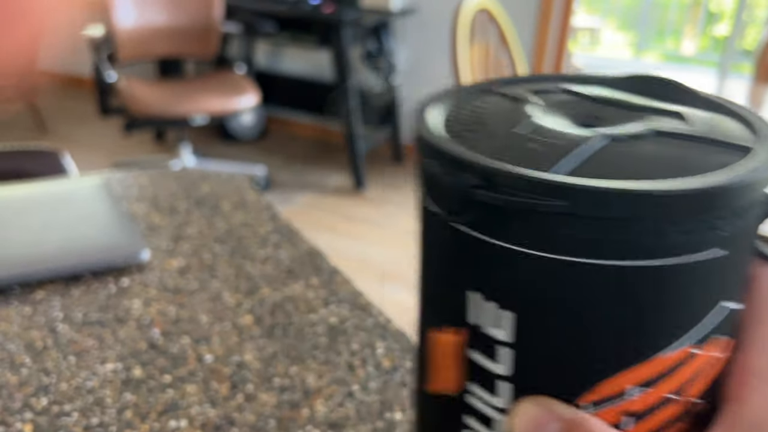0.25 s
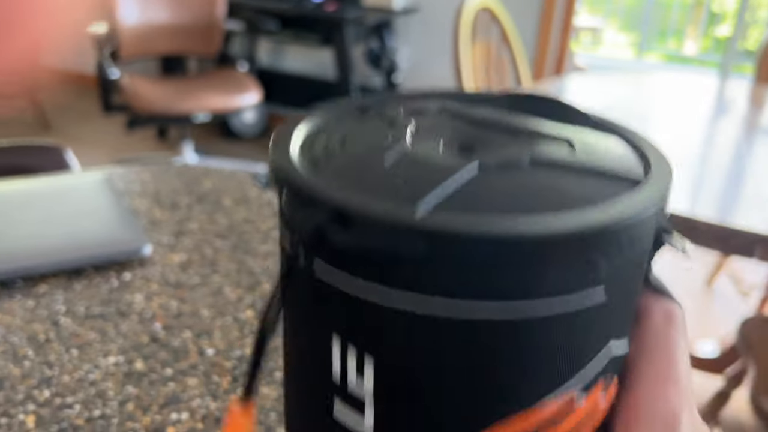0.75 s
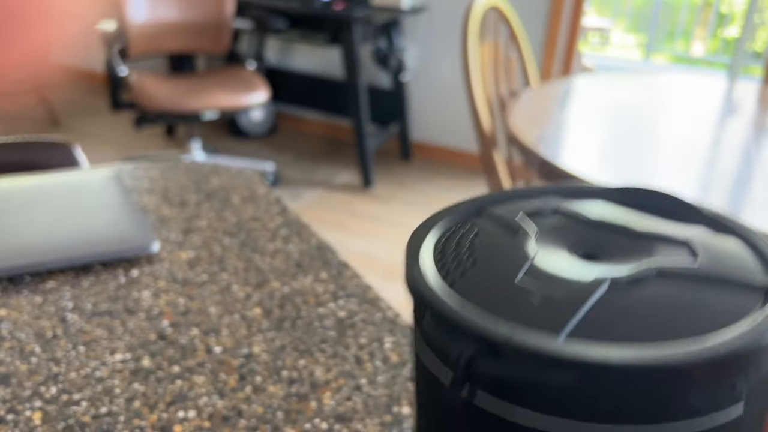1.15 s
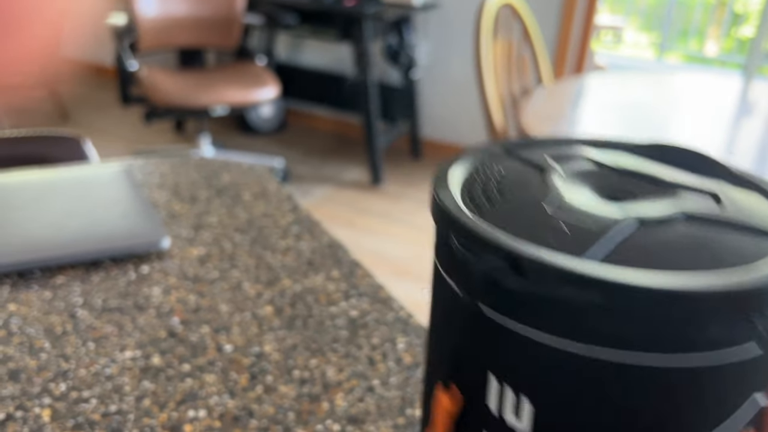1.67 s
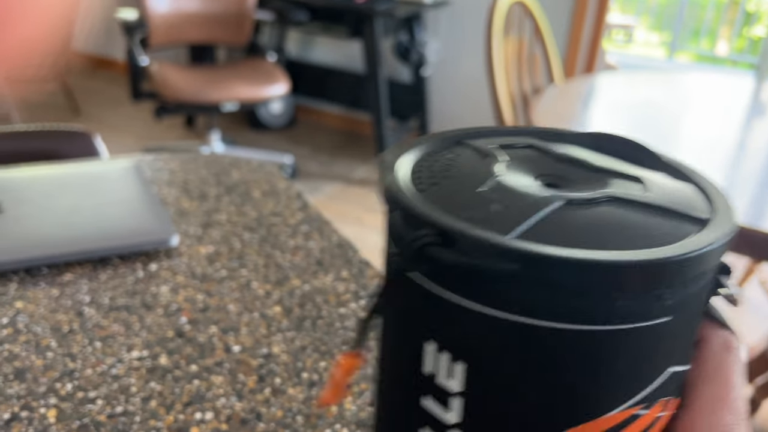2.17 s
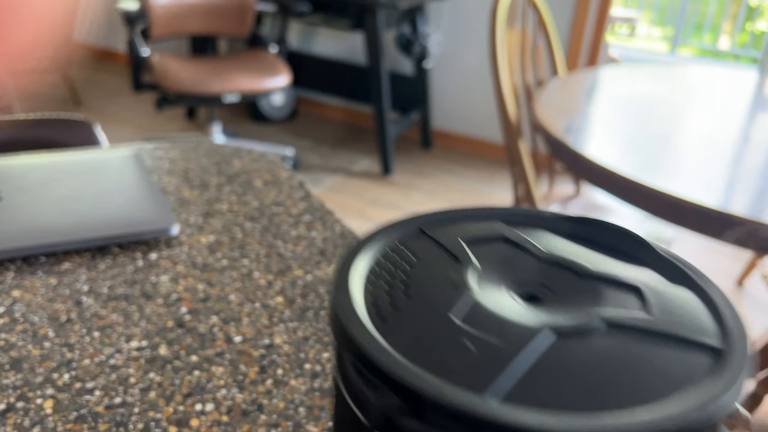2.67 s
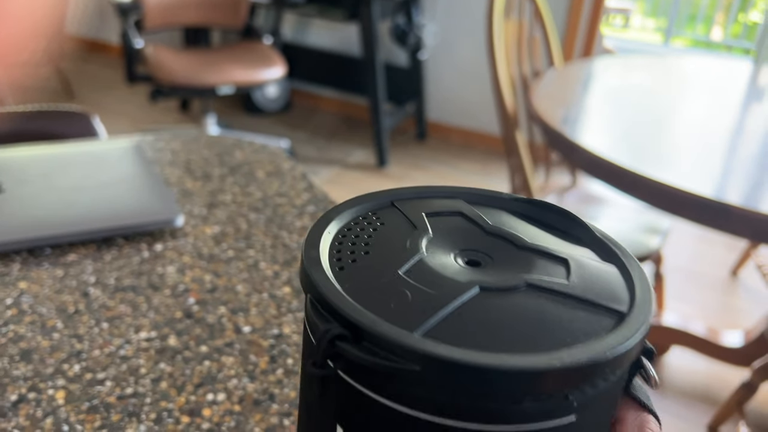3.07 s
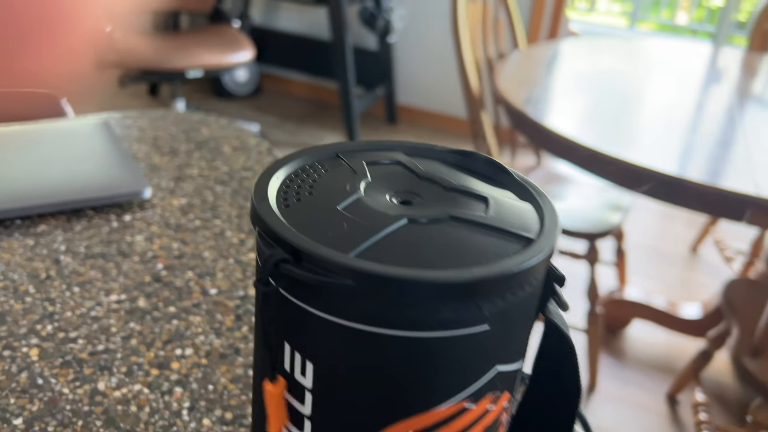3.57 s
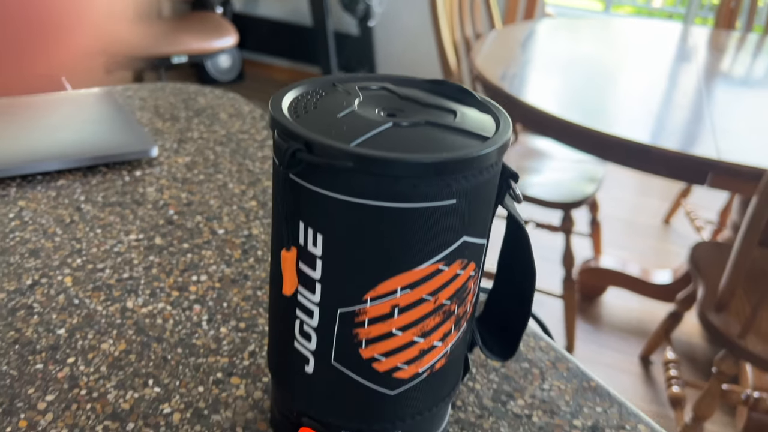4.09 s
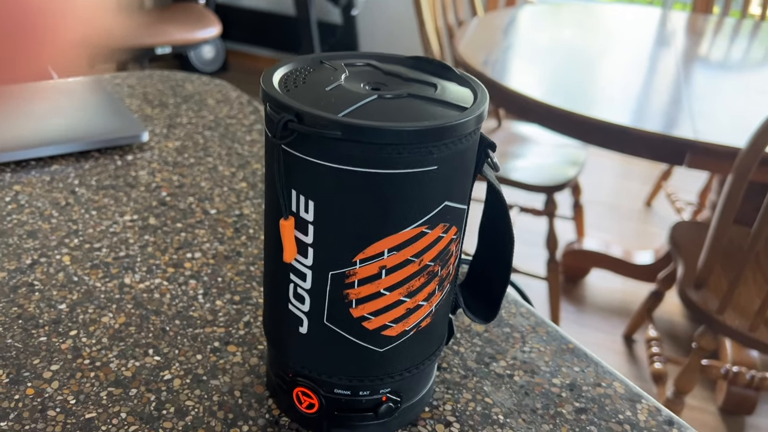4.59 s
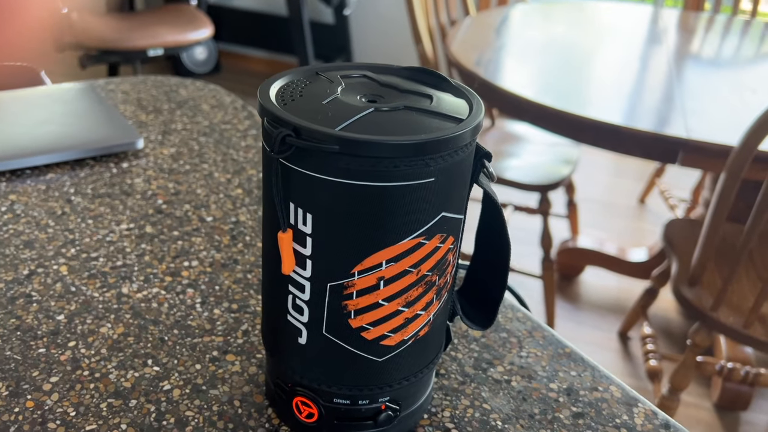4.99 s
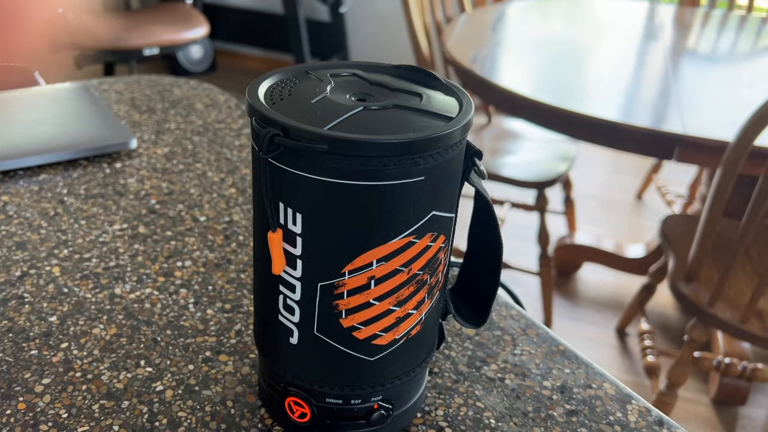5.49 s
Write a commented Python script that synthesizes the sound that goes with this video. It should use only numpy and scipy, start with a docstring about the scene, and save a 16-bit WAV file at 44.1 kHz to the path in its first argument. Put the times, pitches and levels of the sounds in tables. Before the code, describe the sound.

Close stereo sound in a kitchen, with lumpy low rumble and a faint wavering hum throughout. From 0 s, kernels in hot butter sizzle inside a lidded metal pot swirled by hand; the grainy crackle surges strongly around 0.3 to 0.7 s, then keeps fluctuating, with tiny metallic taps, spits and soft dull knocks at about 0.6 to 0.9, 1.2, 1.8 and 2.4 s. A low drone swells from 2.3 to 3 s. At 2.9 s the pot hits the stone counter: one loud, hard, hollow knock with a short room tail. The sizzle becomes thinner and calmer, dotted with fine spits. A sharp hollow double pop cracks at 3.8 s, a dense cluster of pops and knocks at 4.23 to 4.34 s, a lighter pop at 4.5 s, then another burst at 5.13 to 5.2 s. The sizzle rises again near the end, about 5.7 s.

```python
"""A lidded metal kettle of kernels in butter sizzles over a rumbling room and is swirled by hand: knocks, spits, taps.
Around 2.9 s it is set down on a stone counter with a hard knock; from 3.8 s on kernels pop inside, some with knocks.
The sizzle is clumped random clicks filtered by the resonances of the pot; the rumble, hum and drone are shaped noise.
Pops and spits are ticks, air thumps and steam cracks that ring wall modes; knocks are gliding sines with thuds.
The blows echo off the counter and leave a tail in the kitchen."""
import sys
import numpy as np
from scipy import signal
from scipy.fft import rfft, irfft, next_fast_len
from scipy.io import wavfile

SR = 44100
rng = np.random.default_rng(int(sys.argv[2]) if len(sys.argv) > 2 else 0)


def gain_from_db(level_db):
    """Turn a decibel level (scalar or array-like) into a linear amplitude factor."""
    decades = np.asarray(level_db, float) / 20
    return 10 ** decades


def persist_wave(psi):
    """Save psi, clipped to +-1, as 16-bit WAV."""
    counts = np.round(np.clip(psi, -1, 1) * 32767).astype(np.int16)
    wavfile.write(sys.argv[1], SR, np.atleast_2d(counts).T)


N = 253134

AIR_HZ = 359.3   # air tone of the pot
STILL_FROM_S = 2.85   # the pot stops moving and the fat begins to settle


def rms_one(x):
    """Scale to rms 1."""
    return x / np.sqrt(np.mean(x ** 2) + 1e-20)


def at_hz(points, hz):
    """Read a table on a log-frequency axis."""
    table = np.array(points, float)
    return np.interp(np.log(hz + 1), np.log(table[:, 0] + 1), table[:, 1])


def shaped(x, gain):
    """Apply a gain given per FFT bin."""
    size = next_fast_len(N)
    return irfft(rfft(x, size) * gain(np.fft.rfftfreq(size, 1 / SR)), size)[..., :N]


def drift(rate_hz):
    """Random wander of spread 1: noise through two low-pass poles, computed at every 40th sample."""
    pole = np.exp(-80 * np.pi * rate_hz / SR)
    noise = rng.standard_normal(N // 40 + 2002)
    slow = signal.lfilter([1], [1, -2 * pole, pole * pole], noise)[2000:]
    return np.interp(np.arange(N) / 40, np.arange(len(slow)), rms_one(slow))


def ring(clicks, hz, t60):
    """A unit click sets a sine of height 1 ringing."""
    pole, turn = np.exp(-np.log(1000) / (t60 * SR)), 2 * np.pi * hz / SR
    return signal.lfilter([0, np.sin(turn)], [1, -2 * pole * np.cos(turn), pole * pole], clicks + 1e-18)


def band(x, low_hz, high_hz):
    """Butterworth band-pass."""
    return signal.sosfilt(signal.butter(2, [low_hz, high_hz], "band", fs=SR, output="sos"), x)


def dying(t, rise_s, t60):
    """Envelope that swells briefly and dies away."""
    return (1 - np.exp(-t / rise_s)) ** 2 * np.exp(-np.log(1000) * t / t60)


def left_and_right(common, own):
    """Left and right share the common part, each also has a part of its own."""
    # power common to both sides: (frequency [Hz], share [0..1])
    likeness = [(60, 0.79), (300, 1), (700, 0.19), (1500, 0.81), (3000, 0.83), (6000, 0.071), (8600, 0.75),
                (9300, 1.0), (10800, 1.0), (11600, 0.23), (15000, 1)]
    alike = lambda hz: np.clip(at_hz(likeness, hz), 0, 1)
    return shaped(common, lambda hz: np.sqrt(alike(hz))) + shaped(own, lambda hz: np.sqrt(1 - alike(hz)))


def rumble():
    """Lumpy low noise of the house and the hand, a wavering hum, and a low drone that swells once and fades."""
    # noise spectrum, silenced below 20 Hz: (frequency [Hz], relative level [dB per Hz])
    rumble_spectrum = [(15, -43.5), (25, -31), (54, -5.5), (92, -4), (123, -12.5), (232, -8), (285, -14),
                       (321, -12), (510, -18.5), (756, -41.5), (1500, -26.5), (1950, -28.5), (3300, -120)]
    rumble_db, hum_db, drone_db, swell_db = -48, -49.5, -61.5, 19.5
    hum_hz, hum_width_hz = 118.3, 17.3
    drone_hz, drone_width_hz = 150, 60
    from_s, to_s, rise_s, fall_s = 2.31, 2.97, 0.095, 0.25   # the drone at its height
    noise = rng.standard_normal((5, N))
    floor = left_and_right(noise[0], noise[1:3])
    floor = rms_one(shaped(floor, lambda hz: gain_from_db(at_hz(rumble_spectrum, hz)) * (hz > 20)))
    hum = rms_one(band(noise[3], hum_hz - hum_width_hz / 2, hum_hz + hum_width_hz / 2))
    drone = rms_one(band(noise[4], drone_hz - drone_width_hz / 2, drone_hz + drone_width_hz / 2))
    lumps_db = 2.5 * drift(6.0)
    swell = np.interp(np.arange(N) / SR, [from_s - rise_s, from_s, to_s, to_s + fall_s], [0, 1, 1, 0])
    return gain_from_db(rumble_db + lumps_db) * floor + gain_from_db(hum_db) * hum + gain_from_db(drone_db + swell_db * swell) * drone


def kitchen(x):
    """Twelve feedback delays a side, duller on every round, smeared by three short allpasses."""
    t60, wall_cut_hz = 0.71, 7800
    size = next_fast_len(N + SR)
    turn = np.exp(-2j * np.pi * np.fft.rfftfreq(size))   # delay of one sample
    dull = np.exp(-2 * np.pi * wall_cut_hz / SR)
    lowpass = (1 - dull) / (1 - dull * turn)
    tail = np.zeros((2, len(turn)), complex)
    for side, lags in enumerate(rng.uniform(.008, .04, (2, 12)) * SR):
        for k, lag in enumerate(lags):
            loop = np.exp(-np.log(1000) * lag / SR / t60) * lowpass * turn ** round(lag)
            tail[side] += loop / (1 - loop) * (-1) ** k
    for late in (turn ** 53, turn ** 131, turn ** 229):
        tail = tail * (late - .6) / (1 - .6 * late)
    return irfft(rfft(x, size) * tail, size)[:, :N]


def off_counter(x):
    """The direct sound plus a bright echo off the stone, which reaches left and right at different moments."""
    bounce_db, bright_from_hz = -19.5, 190
    lags_s = np.array([[0.000406], [0.000533]])   # left, right
    bright = lambda hz: hz / np.hypot(hz, bright_from_hz)
    return shaped(x, lambda hz: 1 + gain_from_db(bounce_db) * bright(hz) * np.exp(-2j * np.pi * hz * lags_s))


def pot_colour(column):
    """Sizzle spectrum lifted at each resonance of the pot, swirled (column 2) or standing (3)."""
    # resonances: (frequency [Hz], width [Hz], lift while swirled [dB], lift while standing [dB])
    pot = [(362.5, 36.6, 18, 16.5), (980, 51, 5.5, -28), (1941, 143, 25, 16.5), (2358, 210, 13, 14),
           (2990, 147, 10, 9), (3870, 57, 6, 17), (4410, 450, 6.5, 11), (5470, 430, 8, 3),
           (6630, 790, 10, 9), (7920, 860, 8.5, 11.5)]
    # sizzle before the pot colours it: (frequency [Hz], relative level [dB per Hz])
    bare = [(150, -3), (300, 4), (500, -3), (800, 5), (1500, -12), (3000, 0.5), (6000, -8), (9000, -1),
            (11000, 3.5), (14000, 5), (17000, -19)]
    peak = lambda hz, row: gain_from_db(row[column]) / np.sqrt(1 + (2 * (hz - row[0]) / row[1]) ** 4)
    return lambda hz: gain_from_db(at_hz(bare, hz)) * (1 + sum(peak(hz, row) for row in pot))


def crackle():
    """Gain resting at 1 that jumps up at random moments and falls back fast."""
    per_s, jump_db, t60 = 180, -1, 0.01
    jumps = (rng.random(N) < per_s / SR) * np.minimum(rng.exponential(1, N), 3)
    return 1 + gain_from_db(jump_db) * signal.lfilter([1], [1, -np.exp(-np.log(1000) / (t60 * SR))], jumps + 1e-18)


def sizzle():
    """Steam bubbles burst in the fat by the thousand, in clumps; two independent sets fill flickering ranges."""
    # the fry: (time [s], sizzle [dB], brightest hiss [dB], low sizzle that rings the pot [dB])
    fry = [(0.0, -50, -48, -46), (0.1, -49.5, -56, -50), (0.14, -44.5, -44, -44), (0.24, -46.5, -54, -45),
           (0.27, -45.5, -38, -37), (0.32, -38.5, -40, -41.5), (0.38, -41.5, -42.5, -45),
           (0.49, -39, -32, -41.5), (0.53, -45.5, -43, -43), (0.62, -36.5, -39, -43),
           (0.78, -45, -39.5, -47), (0.95, -45, -42.5, -49.5), (1.13, -45, -46.5, -51.5),
           (1.41, -44, -38, -45), (1.45, -43.5, -48, -55), (1.53, -47, -46, -54), (1.57, -40, -46, -47),
           (1.8, -42, -43.5, -47), (2.06, -44, -41, -42.5), (2.15, -48.5, -43, -51.5),
           (2.27, -52.5, -50, -48.5), (2.3, -42.5, -47, -47), (2.45, -42.5, -43.5, -49),
           (2.5, -46, -48, -44), (2.77, -44.5, -41, -52), (2.86, -47.5, -47.5, -52),
           (2.96, -45.5, -48.5, -53), (3.14, -48.5, -47, -45.5), (3.34, -47.5, -42.5, -49.5),
           (3.46, -51.5, -53.5, -48.5), (3.64, -49, -50.5, -58.5), (3.75, -49.5, -50, -53),
           (3.9, -49, -46.5, -44), (4.07, -49, -59, -49.5), (4.25, -53, -41.5, -50),
           (4.4, -46, -45.5, -40.5), (4.55, -53, -48, -51), (4.76, -52, -53, -54),
           (4.89, -54.5, -49.5, -57), (5.07, -49.5, -45, -50.5), (5.25, -47, -42, -45),
           (5.54, -51, -48.5, -51), (5.74, -41, -40.5, -43)]
    per_s, spread_db, clump_db, flicker_db, settle_s = 18000, 3.5, 2.0, 2.5, 0.99
    t = np.arange(N) / SR
    s, *columns = np.transpose(fry)
    body_db, hiss_db, ring_db = [np.interp(t, s, c) for c in columns]

    # two independent sets of bubbles, each with a common, a left and a right part
    clumps = gain_from_db(clump_db * (0.35 * drift(5.4) + 0.33 * drift(55.0)))
    heights = gain_from_db(spread_db * np.minimum(rng.exponential(1, (2, 3, N)), 4)) * rng.standard_normal((2, 3, N))
    bursts = heights * (rng.random((2, 3, N)) < per_s / SR) * clumps
    first, second = [left_and_right(b[0], b[1:]) for b in bursts]

    # only the first set takes on the colour of the standing pot
    still = np.clip((t - STILL_FROM_S) / settle_s, 0, 1)
    swirled, standing = pot_colour(column=2), pot_colour(column=3)
    first = (1 - still) * shaped(first, swirled) + still * shaped(first, standing)
    second = shaped(second, swirled)

    above = lambda hz, edge_hz: 1 / (1 + (edge_hz / (hz + 1)) ** 8)

    def part(bubbles, low_hz, high_hz):
        """One frequency range, with crackle and flicker of its own."""
        window = lambda hz: np.sqrt(np.clip(above(hz, low_hz) - above(hz, high_hz), 0, 1))
        flicker = gain_from_db(flicker_db * (0.35 * drift(10) + drift(84)))
        return crackle() * flicker * shaped(bubbles, window)

    low = rms_one(part(first, 10, 3400))
    body = rms_one(part(second, 3400, 6000) + part(first, 6000, 10000))
    hiss = rms_one(part(second, 10000, 30000))
    return gain_from_db(ring_db) * low + gain_from_db(body_db) * body + gain_from_db(hiss_db) * hiss


def knocks():
    """Base and lid: bending waves glide down to the air tone; counter thuds and washes, body rattles, base rings."""
    # dull knocks: (time [s], knock [dB], glide start above the air tone [Hz], thud [Hz], thud [dB], air thump [dB])
    blows = [(0.613, -24, 1810, 243, -29, -21), (0.781, -31, 2180, 275, -26, -15.5),
             (0.904, -27.5, 1760, 222, -25.5, -29), (1.232, -20.5, 1920, 305, -26, -31),
             (1.817, -24, 1990, 293, -30, -26), (2.361, -31, 1810, 235, -42, -19.5),
             (2.411, -28, 1780, 240, -26, -36), (2.492, -23.5, 2220, 272, -21.5, -19.5),
             (2.911, -1.5, 4090, 287, 4, 4.5), (4.234, -30, 2980, 182, -1.5, -16),
             (4.244, -13.5, 3420, 195, 1.5, -8), (4.2651, -0.5, 3520, 303, -1.5, -5),
             (4.338, -10, 3940, 272, -8, -5), (5.127, -24, 3010, 210, -4.5, 3),
             (5.1667, -8, 4774, 296, -15, 7.5), (5.175, -6, 3480, 278, -8.5, -30)]
    # modes of the pot's base: (frequency [Hz], level against the knock [dB], t60 [s])
    base_modes = [(643, -63, 0.047), (904, -12, 0.03), (1216, -29.5, 0.048), (1354, -13, 0.022),
                  (1930, -31, 0.11)]
    glide_s, thud_t60, air_t60, body_t60, boom_t60, wash_t60 = 0.001103, 0.044, 0.054, 0.024, 0.18, 0.21
    boom_db, wash_db = -20.5, -28   # against the thud, before their envelopes
    rattle_db = -15   # against the knock, before its envelope
    t = np.arange(round(.3 * SR)) / SR
    out = np.zeros(N + len(t))
    for s, knock_db, top_hz, thud_hz, thud_db, air_db in blows:
        noise = rng.standard_normal((3, len(t)))
        base = 0
        for hz, db, t60 in base_modes:
            strength = gain_from_db(rng.normal(0, 2) + db)
            base = base + strength * np.sin(2 * np.pi * hz * t) * dying(t, 0.0013, t60)
        sweep = 2 * np.pi * top_hz * glide_s * (1 - np.exp(-t / glide_s))
        glide = np.sin(sweep + 2 * np.pi * AIR_HZ * t)
        glide = glide * (gain_from_db(knock_db) * dying(t, 0.00059, 0.008) + gain_from_db(air_db) * dying(t, 0.011, air_t60))
        # the thud is in step with the air tone early on, then they beat
        thud_phase = sweep + 2 * np.pi * (AIR_HZ * 0.00612 + thud_hz * (t - .006))
        thud = np.sin(thud_phase) * dying(t, 0.0043, thud_t60)
        boom = rms_one(band(band(noise[1], 47, 200), 47, 200)) * dying(t, 0.01, boom_t60)
        wash = rms_one(band(noise[2], 170, 670)) * dying(t, 0.012, wash_t60)
        body = rms_one(band(band(noise[0], 700, 3050), 700, 3050)) * dying(t, 0.00038, body_t60)
        counter = gain_from_db(thud_db) * (thud + gain_from_db(boom_db) * boom + gain_from_db(wash_db) * wash)
        out[round(s * SR):][:len(t)] += glide + counter + gain_from_db(knock_db) * (gain_from_db(rattle_db) * body + base)
    return out[:N]


def pops_and_spits():
    """List kernels bursting inside the pot and spits of fat, whose air thump follows their wall ring."""
    # kernels: (time [s], tick [dB], tick [Hz], air thump [dB], wall ring [dB], steam crack [dB])
    kernels = [(3.8131, -12, 2200, -4.5, 0.5, -15), (3.8155, -7.5, 7700, 0.5, -18, -5),
               (4.2325, -15, 2300, -12, -27, -19), (4.2355, -17, 8000, -30, -27, -20),
               (4.2395, -18, 5950, -28, -21, -19), (4.2452, -10, 2900, -23, -4.5, -11.5),
               (4.2605, -24, 2100, -5.5, -19, -18), (4.2655, -11, 2770, -6, -22, -35),
               (4.291, -23, 3770, -15, -29, -20), (4.3395, -24.5, 4470, -26, -30, -40),
               (4.4837, -15.5, 4630, -19, -25.5, -13.5), (5.126, -17, 3250, -4.5, -17, -16.5),
               (5.1302, -15, 3420, -2, -21, -20), (5.1385, -30, 2200, -22, -23, -35),
               (5.2164, -18.5, 2900, -18, -27, -45)]
    # spits of fat against wall and lid: (time [s], tick [dB], tick [Hz], wall ring [dB], steam crack [dB])
    spits = [(0.14, -29, 3070, -38, -25), (0.308, -35, 2460, -26, -35), (0.891, -42, 7100, -42, -24.5),
             (1.002, -27, 4630, -39, -27), (1.253, -28.5, 4500, -39, -34), (1.312, -25, 7540, -34, -34),
             (1.4, -41, 7900, -31, -21), (1.478, -26, 7960, -56, -43), (1.557, -25, 4840, -26.5, -19),
             (2.3004, -25.5, 5570, -44, -40), (2.4555, -43, 3000, -54, -20), (2.749, -26, 7660, -43, -36),
             (2.866, -28, 8100, -56, -26), (3.021, -25.5, 7140, -36, -41), (3.06, -36, 2580, -39, -50),
             (3.198, -30, 6550, -33, -22.5), (3.214, -29, 2640, -52, -36), (3.2515, -39, 3070, -30, -21.5),
             (3.37, -18, 9100, -40, -24), (3.436, -33, 2600, -39, -52), (3.455, -33, 8140, -55, -27),
             (3.606, -26, 7600, -32.5, -54), (3.654, -34, 8400, -41, -48), (3.737, -33, 3700, -35, -40.5),
             (4.038, -39, 3000, -34.5, -29.5), (4.066, -29, 12500, -53, -31.5),
             (4.345, -25, 12500, -50, -36), (4.3976, -23, 3820, -36, -63), (4.787, -29, 7400, -46, -26),
             (4.958, -50, 7920, -63, -47), (5.355, -35, 2920, -34.5, -52), (5.6102, -24, 8000, -31.5, -49)]
    air_against_wall_db = -1
    return kernels + [(s, db, hz, wall + air_against_wall_db, wall, crack) for s, db, hz, wall, crack in spits]


def wall_ring(events):
    """Pops and spits strike the wall and lid modes; thrown kernels brush them and loose ones tap them."""
    # wall and lid modes: (frequency [Hz], level [dB], t60 [s], left minus right [dB])
    wall = [(907, -23.5, 0.018, 2), (1303, -15.5, 0.013, -5), (1718, -18, 0.022, 5),
            (1953, -25.5, 0.026, -7), (1992, -6, 0.037, 2.5), (2126, -18.5, 0.064, -1),
            (2290, -24, 0.024, 4), (2615, -19, 0.034, -2), (2830, -26, 0.021, -2), (2983, -14, 0.012, 8),
            (3370, -30, 0.022, -3), (3925, -22, 0.029, -19), (3760, -17.5, 0.035, 12.5),
            (4280, -24, 0.02, 5), (4476, -21, 0.017, 12), (5030, -24, 0.0088, 7), (5510, -21, 0.012, -8),
            (6830, -19, 0.012, 11)]
    brush_db, brush_t60, jostle_t60 = -44.5, 0.047, .4
    taps_per_s, tap_db, tap_spread_db = 40, -50, 2
    blows = np.zeros((len(wall), N))
    for s, _, _, _, ring_db, _ in events:
        strength = gain_from_db(rng.normal(0, 1.5, len(wall))) * (-1) ** np.arange(len(wall))
        blows[:, round(s * SR)] += gain_from_db(ring_db) * strength
    fade = np.exp(-np.log(1000) / (jostle_t60 * SR))
    jostle = signal.lfilter([1], [1, -fade], np.abs(blows) + 1e-18)   # thrown kernels keep brushing the walls
    brushes = gain_from_db(brush_db) * jostle * rng.standard_normal(blows.shape)
    # loose kernels tap the walls while the pot moves
    moving = np.arange(N) < STILL_FROM_S * SR
    taps = (rng.random(N) < taps_per_s / SR) * moving * rng.choice([-1, 1], N)
    taps = taps * gain_from_db(tap_db + tap_spread_db * np.minimum(rng.exponential(1, N), 3))
    blows = blows + taps * rng.uniform(0.28, 1.75, blows.shape)
    out = np.zeros((2, N))
    for blow, brush, (hz, db, t60, left_db) in zip(blows, brushes, wall):
        sides = gain_from_db(np.array([[db + left_db / 2], [db - left_db / 2]]))
        out += sides * (ring(blow, hz, t60) + ring(brush, hz, brush_t60))
    return out


def pops():
    """Each pop or spit: a sharp tick of its own pitch, a late thump of the pot's air, a burst of steam, ringing walls."""
    tick_t60, air_t60, air_rise_s, crack_t60 = 0.0056, 0.032, 0.0023, 0.02
    t = np.arange(round(.15 * SR)) / SR
    out = np.zeros(N + len(t))
    events = pops_and_spits()
    for s, tick_db, tick_hz, air_db, _, crack_db in events:
        noise = rng.standard_normal((2, len(t)))
        tick = band(noise[0] * dying(t, 0.00031, tick_t60), tick_hz / 1.31, min(tick_hz * 1.35, 20000))
        tick = tick / np.abs(tick).max()
        air = np.sin(2 * np.pi * AIR_HZ * t) * dying(t, air_rise_s, air_t60)
        crack = band(noise[1], 7500, 12000) * dying(t, 0.000081, crack_t60)
        out[round(s * SR):][:len(t)] += gain_from_db(tick_db) * tick + gain_from_db(air_db) * air + gain_from_db(crack_db) * crack
    return out[:N] + wall_ring(events)


def scene():
    """Fry, rumble, and blows with their counter echo and room tail."""
    blows_left_db, kitchen_db = 1, -27   # direct blows lean left
    hits = pops() + knocks()
    lean = gain_from_db(np.array([[blows_left_db / 2], [-blows_left_db / 2]]))
    return lean * off_counter(hits) + gain_from_db(kitchen_db) * kitchen(hits) + sizzle() + rumble()


def top_cut(x):
    """Nothing passes above the cut-off."""
    return signal.sosfilt(signal.butter(12, 16260, fs=SR, output="sos"), x)


def record(dry):
    """Stereo phase and level by frequency, sides in opposite phase around 9.3 to 10.8 kHz; peaks are clipped."""
    # stereo phase: (frequency [Hz], left minus right [rad])
    left_lead = [(0, 0), (1000, .2), (2100, .6), (3000, .3), (4500, .9), (6000, .3), (8700, -.4),
                 (9300, -np.pi), (10800, -np.pi), (11500, -2 * np.pi)]
    # stereo level: (frequency [Hz], left minus right [dB])
    left_more = [(60, -1), (110, 2), (200, 3.5), (380, 0.5), (700, 1.5), (1290, 4.5), (2380, 2), (4400, 1),
                 (8120, 1), (15000, 0)]
    half = lambda hz: gain_from_db(at_hz(left_more, hz) / 2) * np.exp(.5j * at_hz(left_lead, hz))
    pair = shaped(dry, lambda hz: np.array([half(hz), 1 / half(hz)]))
    mix = np.clip(pair, -1, 1)
    return top_cut(mix)


dry = scene()
out = record(dry)
persist_wave(out)
```